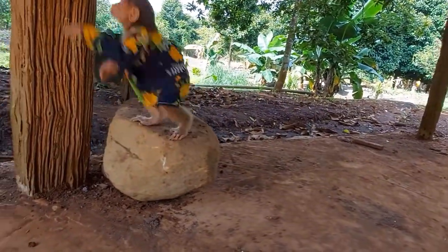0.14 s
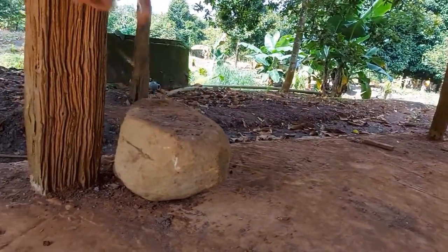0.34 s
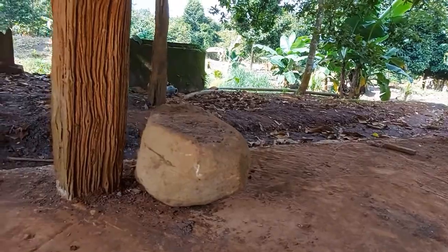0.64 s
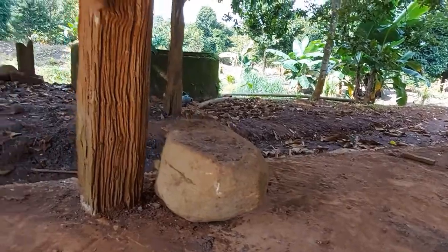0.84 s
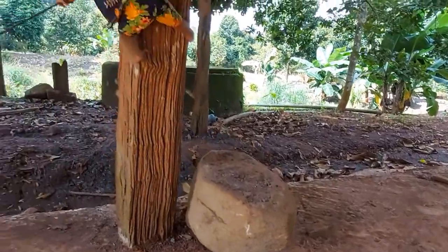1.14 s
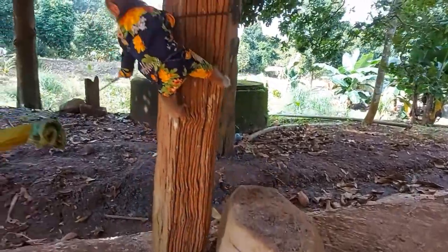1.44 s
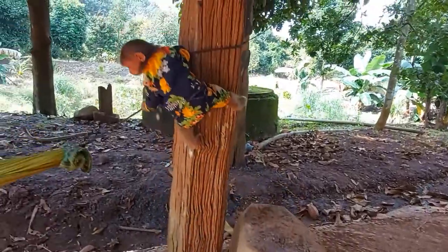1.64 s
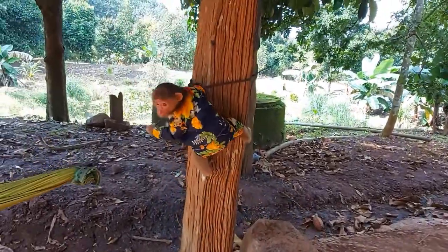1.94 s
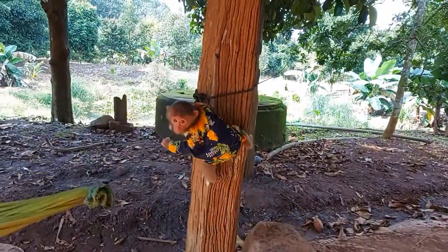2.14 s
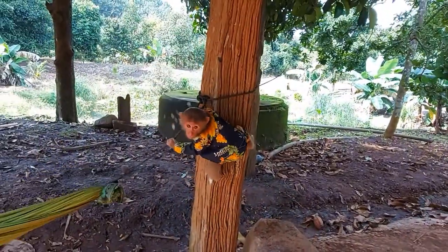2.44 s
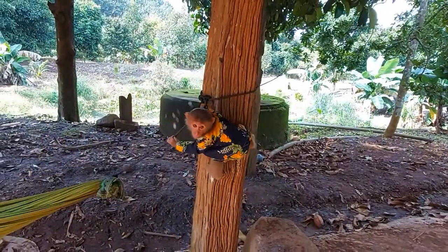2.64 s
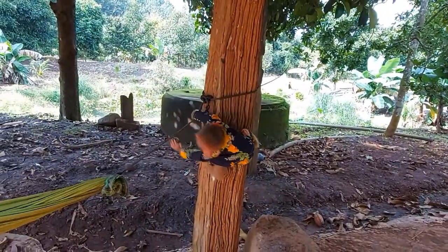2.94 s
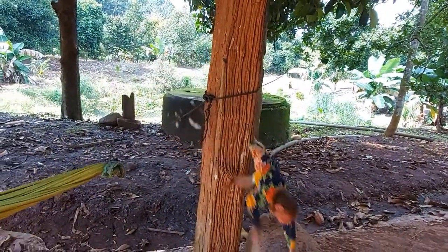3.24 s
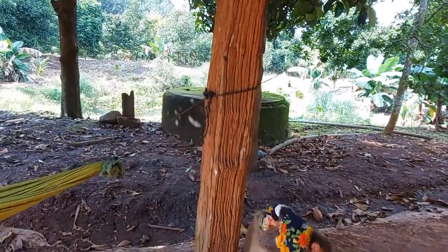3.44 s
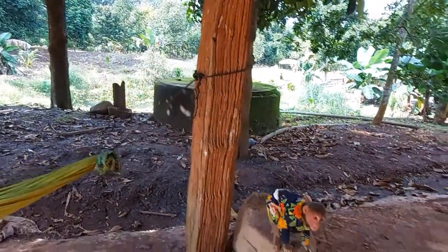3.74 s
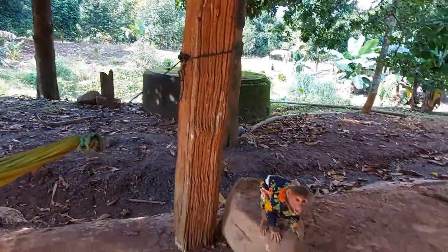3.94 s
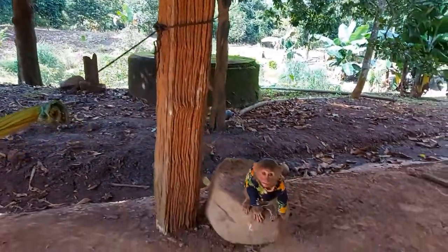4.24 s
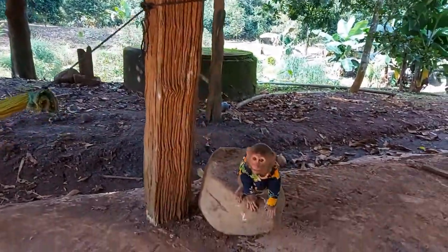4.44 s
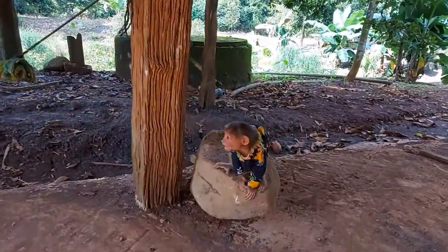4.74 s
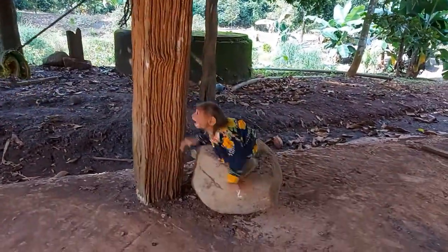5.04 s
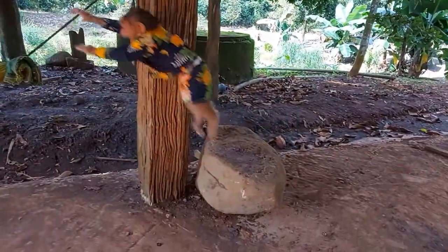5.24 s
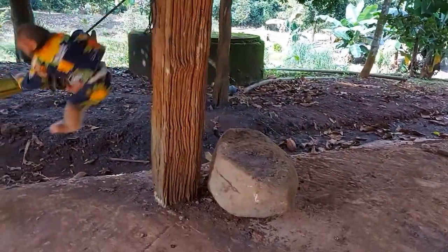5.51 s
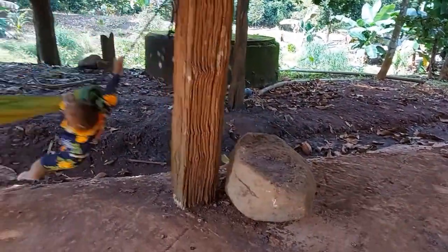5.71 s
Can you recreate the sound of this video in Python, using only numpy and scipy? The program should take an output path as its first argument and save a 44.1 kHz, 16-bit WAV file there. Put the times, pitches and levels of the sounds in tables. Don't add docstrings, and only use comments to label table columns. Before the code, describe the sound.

A young monkey gives a tiny grunt, then a loud hoarse screech sagging in pitch as it leaps. Sparse taps and bark scrapes follow, with two faint bird chirps. A short falling squeal, a cluster of stony taps, a rising squeal and a weaker raspy screech come later. Open yard under trees, light echo, faint cicadas, low wind rumble on a stereo microphone.

```python
import sys
import numpy as np
from scipy import signal
from scipy.fft import rfft, irfft, next_fast_len
from scipy.io import wavfile
from scipy.ndimage import uniform_filter1d, map_coordinates

SR = 44100
rng = np.random.default_rng(int(sys.argv[2]) if len(sys.argv) > 2 else 0)


def volts(x):
    e = np.asarray(x, float) / 20
    return 10 ** e


def materialize(psi):
    bounded = np.clip(np.atleast_2d(psi).T, -1, 1)
    quanta = np.round(bounded * 32767).astype(np.int16)
    wavfile.write(sys.argv[1], SR, quanta)


N = 258867
T = np.arange(N) / SR


# t/s, pitch f/Hz, voice level/dB, left-right/dB
SQUEAL_A = [
    (3.844, 1259, -30, 8),
    (3.856, 1220, -27, 2.5),
    (3.877, 1243, -24, 4),
    (3.9, 1229, -27, 2.5),
    (3.912, 1198, -31, -4),
    (3.924, 1205, -30.5, 3.5),
    (3.952, 1156, -34.5, 1),
    (3.963, 1103, -30.5, 8),
    (3.99, 944, -39, 6.5),
]
SQUEAL_B = [
    (4.816, 1230, -42, 12),
    (4.83, 1339, -27, 8),
    (4.881, 1411, -30, 10.5),
    (4.915, 1485, -31.5, 10),
    (4.98, 1511, -27.5, -1),
    (5.0, 1496, -34, 4),
    (5.03, 1551, -24.5, 0.5),
    (5.053, 1735, -27, 7.5),
    (5.079, 2580, -36.5, 8),
]
# f/Hz, level/dB
MOUTH_A = [(900, -20), (1250, -13), (2100, -18), (2470, 0), (3200, -10), (3700, -15.5), (4900, -20),
           (6200, -40)]
MOUTH_B = [(1200, -7), (1500, -26), (2900, 2), (4000, -16.5), (4600, -7.5), (5600, -36.5), (6300, -17.5),
           (8500, -15.5)]
# f/Hz, level/dB per Hz
BREATH = [(500, -13.5), (1500, -5.5), (3000, -1), (5000, -5.5), (8000, -10), (15000, -8)]
PULSE_DB = .8


def squeal(rows, mouth, attack_s, release_s, lag_s, top_db, slope_db, breath_db, flutter_db, lean):
    span, hz, voice_db, pan_db, gate = call(rows, attack_s, release_s, levels=[2])
    n = len(hz)
    levels_db = [voice_db + along(mouth, k * hz) for k in range(1, 5)]
    loudest_db, upper_db = np.max(levels_db, axis=0), np.max(levels_db[2:], axis=0)
    levels_db += [upper_db + top_db + slope_db * k + 3 * wobble(23, n) for k in range(7)]

    glide = uniform_filter1d(np.abs(np.gradient(np.log(hz))) * SR, size=600)
    roughness = (0.0013 + 0.0033 * glide) * wobble(250, n)
    phase = 2 * np.pi * np.cumsum(hz * (1 + roughness)) / SR

    def flutter(k):
        echoes = np.array([wobble(65, n), wobble(79, n)])
        pulsing = PULSE_DB * min(k - 1, 3) ** 2 * (k < 5) * wobble(110, n) ** 2
        return volts(flutter_db * echoes - pulsing)

    partials = []
    for k, db in enumerate(levels_db, 1):
        partials.append(volts(db + 7.5) * flutter(k) * np.sin(k * phase) * (k * hz < 15500))
    beams = partials[:3] + [sum(partials[3:])]
    voice = sum(placed(p, share * pan_db, min(abs(share), 1) * lag_s) for p, share in zip(beams, lean))
    breath_level = volts(loudest_db + breath_db + 2.1 * np.minimum(glide, 10))
    breath = breath_level * coloured(pair([(1000, 0.83)], size=n), BREATH)
    return at(span, gate * (voice + breath))


# t/s, pitch f/Hz, voice level/dB, airflow level/dB
SCREECH_A = [
    (0.521, 744.5, -40.5, -51),
    (0.58, 943.6, -36.5, -39),
    (0.615, 939.5, -35.5, -34.5),
    (0.65, 888, -30, -20),
    (0.664, 786.5, -31.5, -24.5),
    (0.715, 782, -31, -25),
    (0.78, 666.4, -30, -27.5),
    (0.85, 535, -31.5, -44.5),
    (0.89, 310, -46, -48),
]
SCREECH_B = [
    (5.195, 670.2, -44.5, -55.5),
    (5.24, 583.6, -41.5, -54.5),
    (5.3, 601, -48.5, -51),
    (5.352, 767.4, -40, -40),
    (5.39, 692.7, -37, -31),
    (5.41, 772.7, -32, -26),
    (5.48, 771, -34.5, -25),
    (5.53, 786, -32.5, -30),
    (5.7, 738, -44, -36.5),
]
# f/Hz, level/dB
CHEST = [(300, 1.5), (600, -14), (720, -10), (800, -16), (940, -14)]
# f/Hz, level/dB per Hz
THROAT = [(700, -20), (1150, -24.5), (1900, -11), (2500, -11), (3100, -0.5), (3600, -6.5), (4200, -10.5),
          (5100, -1.5), (5900, -5), (6800, -21.5)]
# f/Hz, level/dB per Hz
HISS = [(4700, -33.5), (5500, -21), (6200, -16), (6900, -2.5), (7500, -8), (8500, -2.5), (9500, -4),
        (10500, -9), (12000, -21), (13500, -54.5)]
# f/Hz, level/dB per Hz
AIR = [(9000, -24.5), (11000, 1.5), (12500, 0.5), (14000, 1.5), (15300, -0.5), (15800, -14.5)]
# f/Hz, level/dB
NASAL_DIP = [(4200, 0), (4700, -10), (5300, -12), (6000, 0)]
CATCHES = [.628, 0.702, 5.201, 5.302, 5.39, 5.495, 5.536]
CATCH_S, CATCH_DB = .014, -18
FRAY_S, FRAYED_DB = .025, -26
HALF_DB = -13


def screech(rows, attack_s, release_s, share, fray_at_s, teeth_hz, teeth_rise, air_gap_db, air_grows,
            jitter, break_db, whistle_db, pan_db, lag_s, alike):
    span, hz, throat_db, hiss_db, gate = call(rows, attack_s, release_s, levels=[2, 3])
    n = len(hz)
    weaker_db = hiss_db.max() - hiss_db
    frayed = .5 + .5 * np.tanh((T[span] - fray_at_s) / FRAY_S)
    caught = sum(np.exp(-((T[span] - s) / CATCH_S) ** 2) for s in CATCHES)
    share = share + (.9 - share) * np.maximum(frayed, .2 * caught)
    low_db = throat_db + along(CHEST, hz) + FRAYED_DB * frayed + CATCH_DB * caught
    air_db = hiss_db.max() + air_gap_db - air_grows * weaker_db
    teeth_hz = teeth_hz + teeth_rise * weaker_db + 150 * wobble(15, n)
    unsteady = jitter * (wobble(200, n) + .5 * wobble(30, n))
    phase = 2 * np.pi * np.cumsum(hz * (1 + unsteady)) / SR

    def wavering(k):
        dropout = np.abs([wobble(35, n) + 0.7 * wobble(35, n) * side for side in (1, -1)])
        level = volts(-break_db * dropout + 2.5 * wobble(158.5, n))
        return level * np.cos(k * phase + 2.5 * wobble(12, n) + .07 * k * wobble(90, n))

    partials = sum(wavering(k) * (k * hz < 15500) for k in range(2, 17))
    halves = volts(HALF_DB + 6.2 * wobble(15.6, n)) * sum(wavering(k + .5) for k in range(2, 9))
    partials = placed(unit(partials + halves), 0, lag_s)
    breath = pair([(3000, alike), (10000, .05)], lag_s, n)
    puffs = unit(breath * (1 + .5 * np.cos(phase)) * volts(2.4 * wobble(60, n)))

    def mix(noisy):
        return np.sqrt(1 - noisy) * partials + np.sqrt(noisy) * puffs

    fundamental = placed(np.sin(phase + .5 * wobble(110, n)), 2, 0.21 * lag_s)
    low = volts(low_db + 7 - 4 * np.abs(wobble(28, n))) * fundamental
    turbulent = mix(1 - .5 * (1 - share))
    teeth = np.array([wobble(900, n), wobble(900, n)]) * np.cos(2 * np.pi * np.cumsum(teeth_hz) / SR)
    hiss = volts(-5 * frayed) * coloured(turbulent, HISS) + volts(whistle_db) * unit(teeth)
    air = volts(air_db - 6 * frayed) * coloured(puffs, AIR)
    high = placed(volts(hiss_db) * hiss + air, pan_db, 0)
    throat = volts(throat_db) * coloured(mix(share), THROAT)
    upper = filtered(throat + high, lambda f: volts(along(NASAL_DIP, f)))
    return at(span, gate * (low + upper))


# t/s, pitch f/Hz, level/dB
GRUNT = [
    (.32, 278, -76.5),
    (.33, 285.5, -57),
    (.352, 276, -58.5),
    (.365, 274, -70),
]
GRUNT_PARTIALS = [10, 4.5, -8, -10.5]


def grunt():
    span, hz, db, gate = curves(GRUNT)
    phase = 2 * np.pi * np.cumsum(hz) / SR
    voice = sum(volts(db + p) * np.cos(k * phase) for k, p in enumerate(GRUNT_PARTIALS, 1))
    return at(span, placed(gate * voice, 2, 0))


# t/s, peak level/dB, left-right/dB, t60/s, knock level/dB
TAPS = [(0.4933, -27, 10.5, 0.15, -25), (1.1077, -55, 28, 0.027, -8), (1.3012, -55.5, 21, 0.033, -10),
        (1.96, -57, 23.5, 0.02, -7), (1.9894, -27.5, 15, 0.017, -23), (2.394, -52, 4.5, 0.029, -12),
        (3.1512, -69.5, 1, 0.03, -2), (3.496, -49, 15, 0.039, -12), (3.6651, -62, -4, 0.027, -18),
        (3.7664, -56, 0, 0.023, 5.5), (4.2807, -37, 19.5, 0.013, -7.5), (4.303, -52.5, 16, 0.034, -0.5),
        (4.3402, -43, 31, 0.0257, -16), (4.3926, -48.5, 16.5, 0.023, 4), (4.414, -27.5, 9.5, 0.071, -1.5),
        (4.4388, -45, 3, 0.086, 6), (4.5166, -49.5, 1, 0.014, 1), (4.6408, -48, 15.5, 0.022, -3),
        (5.185, -29.5, -3.5, 0.031, -11)]
# f/Hz, width f/Hz, level/dB
STONE = [(1160, 610, -1.5), (2000, 620, 2.5), (2730, 400, 2.5), (4230, 230, 1.5)]


def taps():
    cracks = np.zeros((2, N + SR))
    knocks = np.zeros_like(cracks)
    t = np.arange(SR // 5) / SR
    for s, db, pan_db, t60, knock_db in TAPS:
        decay = volts(db - 17 - 60 * t / max(t60, .004))
        crack = decay * rng.standard_normal(len(t)) * volts([[pan_db / 2], [-pan_db / 2]])
        span = slice(round(s * SR), round(s * SR) + len(t))
        cracks[:, span] += crack
        knocks[:, span] += volts(knock_db + 16.5) * crack
    snap = filtered(cracks[:, :N], resonances([(7000, 25000, -6.5)]))
    return snap + filtered(knocks[:, :N], resonances(STONE))


# t/s, rise t/s, fall t/s, level/dB
RUSTLE = [(.19, .03, 0.088, -62.5), (.34, 0.027, .04, -56), (0.418, 0.037, 0.13, -64.5),
          (1.0, 0.026, 0.03, -79), (1.2, 0.091, 0.15, -64.5), (1.99, 0.052, .06, -73),
          (3.2, 0.024, 0.067, -66.5), (3.42, 0.025, 0.049, -53.5), (3.52, 0.027, 0.029, -81.5),
          (4.3, 0.03, 0.18, -62.5), (4.43, 0.024, 0.07, -65.5)]
# f/Hz, level/dB per Hz
SCRAPE = [(300, -31.5), (800, -12.5), (2000, -4), (5000, -3.5), (9000, -6.5), (14000, -4), (16000, -20.5)]
# t/s, rise t/s, fall t/s, level/dB
LEAP = [
    (5.192, .003, .035, -36.5),
]


def rustle():
    clumps = volts(3.0 * wobble(60) + 1.1 * wobble(400))
    drag = swells(RUSTLE) * coloured(pair([(500, 0.22), (2000, 0.036)]) * clumps, SCRAPE)
    whip = swells(LEAP) * coloured(pair([(10000, .1)]) * clumps, AIR)
    return drag + whip


# f/Hz, t60/s
TREES = [(300, 0.21), (2500, 0.38), (8000, 0.35), (15000, 0.024)]


def trees(x):
    hz, t, z = signal.stft(rng.standard_normal((2, SR // 2)), SR, nperseg=256)
    decay = volts(-60 * t / along(TREES, hz)[:, None])
    tail = signal.istft(z * decay, SR, nperseg=256)[1]
    tail = np.pad(tail / np.linalg.norm(tail[0]), ((0, 0), (220, 0)))
    return signal.fftconvolve(x, tail, axes=1)[:, :N]


# t/s, from f/Hz, to f/Hz, length t/s, level/dB
CHIRPS = [
    (2.722, 7400, 6930, 0.049, -67),
    (3.02, 7400, 6750, 0.043, -67),
]


def bird():
    out = np.zeros(N)
    for s, from_hz, to_hz, length, db in CHIRPS:
        u = np.clip((T - s) / length, 0, 1)
        phase = 2 * np.pi * np.cumsum(from_hz + (to_hz - from_hz) * u) / SR
        out += volts(db) * np.sin(np.pi * u) * np.sin(phase)
    return placed(out, 1.5, 0)


# f/Hz, level/dB per Hz
WIND = [(12, -47.5), (20, -19.5), (47, -1.5), (64, 3.5), (108, 2), (200, -12.5), (260, -56.5), (440, -120)]
# t/s, rise t/s, fall t/s, level/dB
GUSTS = [(.19, 0.044, 0.057, -58.5), (.63, 0.051, 0.051, -44.5), (.88, 0.088, 0.069, -51),
         (1.32, 0.057, 0.083, -58.5), (1.68, 0.095, 0.071, -66.5), (3.22, .08, 0.056, -64),
         (3.47, 0.035, .3, -62), (4.42, 0.076, 0.06, -51), (5.45, 0.2, 0.22, -60)]
# f/Hz, level/dB per Hz
RUMBLE = [(65, -38), (110, -4.5), (150, -7), (168, -13), (296, -8), (336, -11), (431, -17), (520, -24),
          (938, -28.5), (1220, -34), (2200, -33.5), (2860, -51), (4840, -120)]
# t/s, rise t/s, fall t/s, level/dB
THUMPS = [(.38, 0.028, 0.044, -63), (.54, 0.087, 0.081, -58.5), (.88, .06, .04, -61.5),
          (1.16, 0.0904, 0.17, -66.5), (3.42, 0.28, 0.087, -70.5), (3.96, 0.18, .1, -70),
          (4.36, 0.051, 0.086, -71), (5.05, .15, 0.21, -61.5), (5.5, 0.26, 0.22, -70.5)]
# f/Hz, width f/Hz, level/dB
CICADAS = [(2881, 126, -2.5), (4503, 218, -5), (5780, 250, -7.5), (6880, 210, -14.5), (8840, 200, -15),
           (10850, 200, -30.5), (12200, 54, -17.5), (14500, 300, -23.5)]
# f/Hz, level/dB per Hz
FAR_HISS = [(880, -69), (1500, -45), (2250, -17), (2880, 5.5), (3540, -32.5), (4580, -24.5), (11600, -11),
            (12700, -19.5), (14100, -4.5), (15900, -23)]
# f/Hz, left-right likeness
ALIKE = [(60, 1), (150, 0.93), (380, 0.71), (950, 0.16), (2380, -0.0052), (5980, 0.0061), (15000, -0.06)]
WIND_DB, RUMBLE_DB = -64.5, -69.5


def yard():
    gusty = pair([(30, 0.97), (150, 0.81)]) * volts(1.2 * wobble(9))
    wind = (volts(WIND_DB) + swells(GUSTS)) * coloured(gusty, WIND)
    rolling = pair(ALIKE) * volts(1.6 * wobble(12))
    rumble = (volts(RUMBLE_DB) + swells(THUMPS)) * volts(3.5) * coloured(rolling, RUMBLE)
    band = resonances(CICADAS)
    buzz = pair(ALIKE) * volts(0.91 * wobble(60))
    chorus = unit(filtered(buzz, lambda f: band(f) * (f > 2200) * (f < 14900)))
    chorus = volts(-65 + 0.63 * wobble(0.67)) * chorus
    far_hiss = volts(-65.0) * coloured(pair(ALIKE), FAR_HISS)
    return (wind + rumble) * volts([[.9], [-.9]]) + chorus + far_hiss


SILENT_DB = 27


def call(rows, attack_s, release_s, levels):
    rows = np.array(rows, float)
    columns = rows.shape[1]
    quiet = -SILENT_DB * np.isin(np.arange(columns), levels)
    shift = np.eye(columns)[0]
    return curves([rows[0] + quiet - attack_s * shift, *rows, rows[-1] + quiet + release_s * shift])


def curves(rows):
    s, *cols = np.transpose(rows)
    span = slice(max(round(s[0] * SR) - 200, 0), round(s[-1] * SR) + 400)
    t = T[span]
    gate = uniform_filter1d(1. * (t >= s[0]) * (t < s[-1]), size=70)
    return [span] + [uniform_filter1d(np.interp(t, s, c), size=160) for c in cols] + [gate]


def swells(rows):
    return sum(volts(db) * np.exp(np.minimum((T - s) / rise, (s - T) / fall)) for s, rise, fall, db in rows)


def wobble(rate, size=N):
    knots = rng.standard_normal(int(size * rate / SR) + 4)
    return map_coordinates(knots, [T[:size] * rate], order=2)


def at(span, x):
    out = np.zeros((2, N))
    out[:, span] = x
    return out


def placed(x, pan_db, lag_s):
    sides = np.array([[1], [-1]])
    return filtered(x, lambda hz: np.exp(-1j * np.pi * hz * lag_s * sides)) * volts(sides * pan_db / 2)


def pair(alike, lag_s=0, size=N):
    def shares(hz):
        turn = np.arccos(np.clip(along(alike, hz), -1, 1)) / 2
        return np.array([np.cos(turn), np.sin(turn)])

    a, b = filtered(rng.standard_normal((2, size)), shares)
    return placed(np.array([a + b, a - b]), 0, lag_s)


def filtered(x, response):
    n = x.shape[-1]
    m = next_fast_len(n + SR // 4)
    return irfft(rfft(x, m) * response(np.fft.rfftfreq(m, 1 / SR)), m)[..., :n]


def coloured(x, spectrum):
    return unit(filtered(x, lambda hz: volts(along(spectrum, hz))))


def resonances(modes):
    def response(f):
        total = 0
        for k, (c, w, db) in enumerate(modes):
            total = total + (-1) ** k * volts(db) * 1j * f * w / (c * c - f * f + 1j * f * w)
        return total

    return response


def along(points, hz):
    f, v = np.transpose(points)
    return np.interp(np.log(hz + 1), np.log(f + 1), v)


def unit(x):
    return x / np.sqrt(np.mean(x ** 2) + 1e-20)


def scene():
    first = squeal(SQUEAL_A, MOUTH_A, attack_s=.004, release_s=0.032, lag_s=.00009, top_db=-22.5,
                   slope_db=0.0, breath_db=-31, flutter_db=1.5, lean=[0.56, 1.3, 0.95, 0.61])
    second = squeal(SQUEAL_B, MOUTH_B, attack_s=.022, release_s=0.0061, lag_s=-0.00013, top_db=-26.0,
                    slope_db=-3.0, breath_db=-31, flutter_db=1.0, lean=[0.56, 1.72, -0.39, 0.32])
    hoarse = screech(SCREECH_A, attack_s=.008, release_s=.08, share=.06, fray_at_s=.91,
                     teeth_hz=8500, teeth_rise=5.8, air_gap_db=-7.5, air_grows=0.82, jitter=0.00723,
                     break_db=10, whistle_db=-3.5, pan_db=2.7, lag_s=-0.000249, alike=0.93)
    hoarser = screech(SCREECH_B, attack_s=.015, release_s=0.091, share=.1, fray_at_s=5.56,
                      teeth_hz=8260, teeth_rise=25, air_gap_db=-17.5, air_grows=.8, jitter=0.01814,
                      break_db=10, whistle_db=-3.5, pan_db=-0.7, lag_s=-0.000208, alike=0.11)
    small = grunt() + taps() + bird()
    echoing = [(first, -13), (second, -11), (hoarse, -14), (hoarser, -14), (small, -14)]
    return sum(x + volts(echo_db) * trees(x) for x, echo_db in echoing) + rustle() + yard()


def roll_off(x):
    return signal.sosfilt(signal.butter(12, 16290, fs=SR, output="sos"), x)


def record(dry):
    rounded = dry / (1 + (dry / .5) ** 4) ** (1 / 4)
    limited = filtered(rounded, lambda hz: hz < 15700)
    return roll_off(limited)


dry = scene()
out = record(dry)
materialize(out)
```